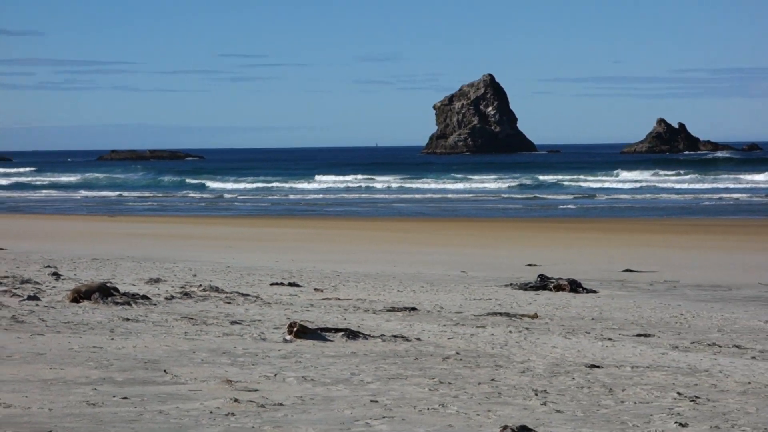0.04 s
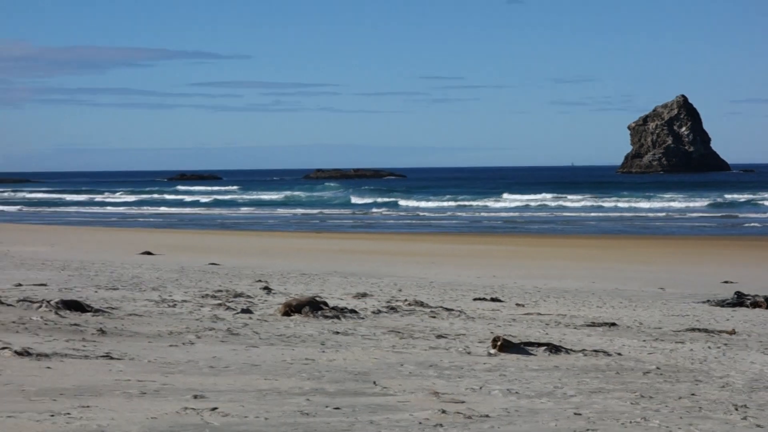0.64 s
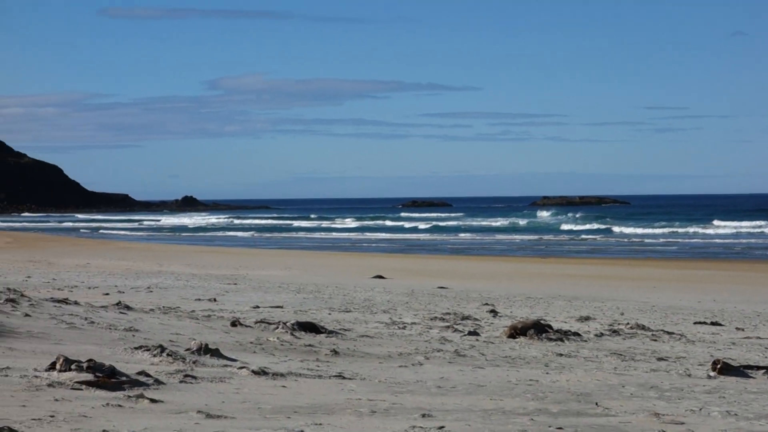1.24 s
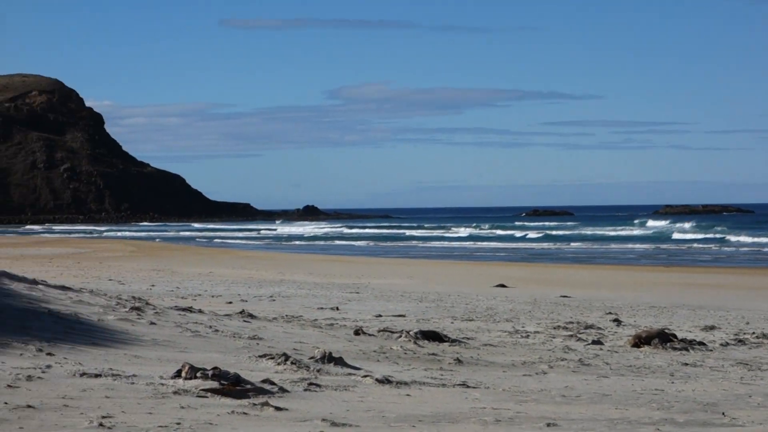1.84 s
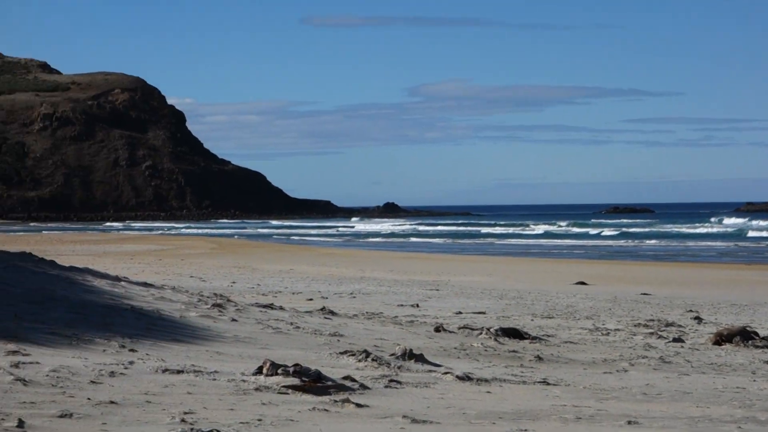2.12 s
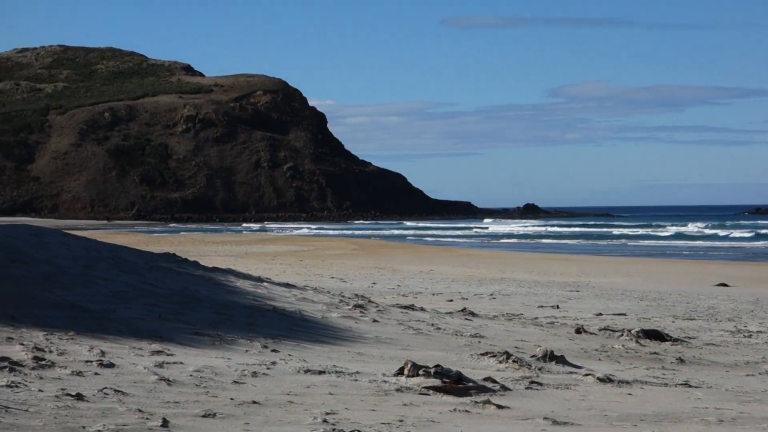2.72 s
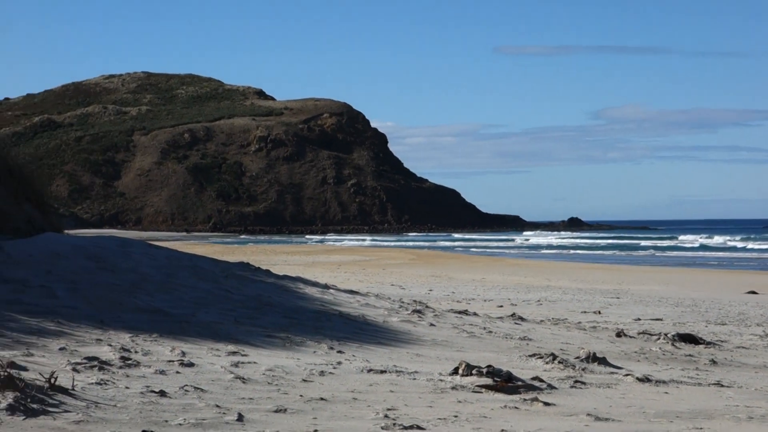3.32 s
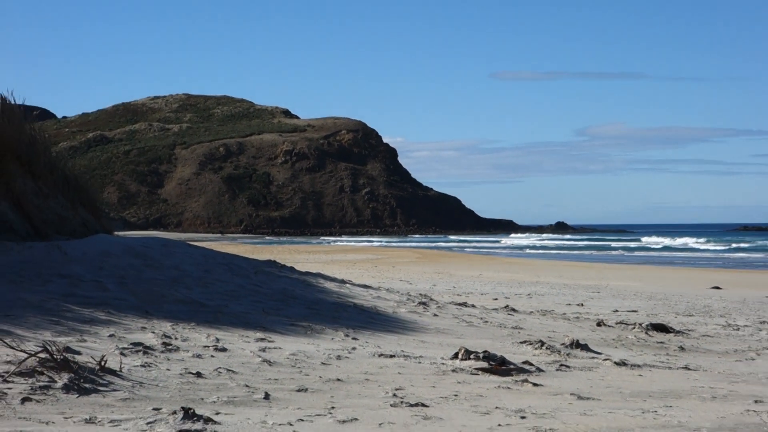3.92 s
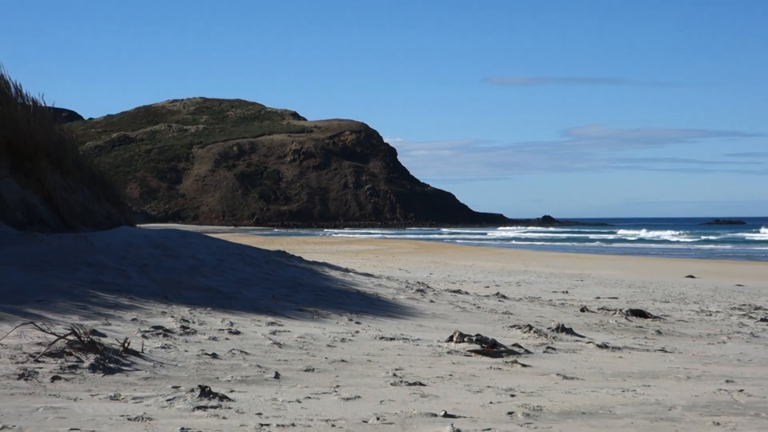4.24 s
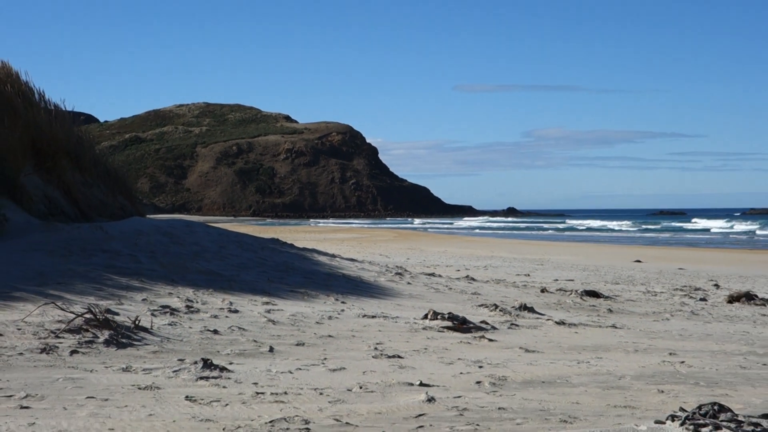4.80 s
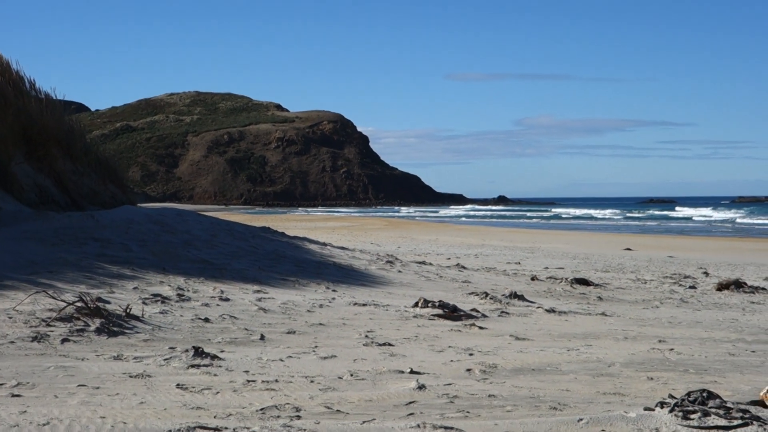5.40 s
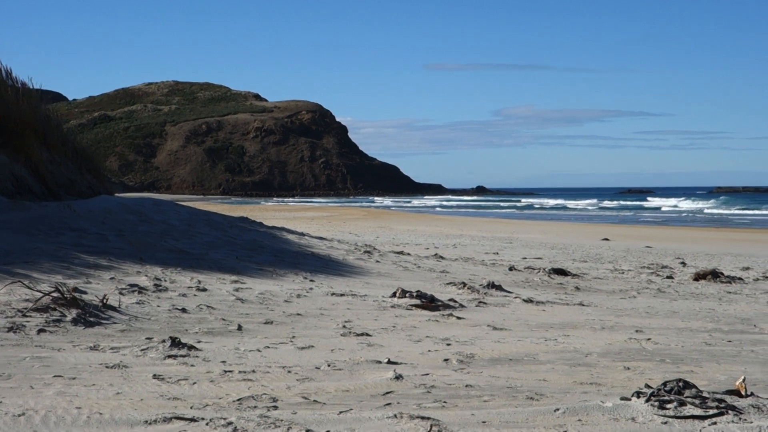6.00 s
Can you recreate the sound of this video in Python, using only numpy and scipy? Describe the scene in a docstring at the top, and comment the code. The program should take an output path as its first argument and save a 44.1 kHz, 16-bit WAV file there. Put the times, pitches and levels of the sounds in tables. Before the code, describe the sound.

On a beach, distant breakers merge into a soft, steady roar, slightly to the right. Close up, gusty wind thumps and rumbles on the camera's microphone, coming in uneven bursts with brief lulls between them. The strongest buffeting comes shortly before the middle and again near the end. Very faint finger ticks, a small zoom whirr and a light hiss sit in the background.

```python
"""Low thumps and buffeting of gusty beach wind on a hand-held camera's two microphone ports.
Each eddy crosses the ports as a short pressure pulse; gusts make the stream louder and brighter.
Distant surf washes steadily from the right. Under it lie handling ticks, a faint zoom motor
and preamp hiss."""
import sys
import numpy as np
from scipy import signal
from scipy.fft import rfft, irfft
from scipy.io import wavfile
from scipy.ndimage import uniform_filter1d

SR = 44100
rng = np.random.default_rng(int(sys.argv[2]) if len(sys.argv) > 2 else 0)


def transcribe(signal):
    """Save signal, clipped to [-1, 1], as a 16-bit WAV file at the path in sys.argv[1]."""
    frames = np.atleast_2d(signal).T
    limited = np.clip(frames, -1, 1)
    pcm = np.round(limited * 32767).astype(np.int16)
    wavfile.write(sys.argv[1], SR, pcm)


N = 267246
T = np.arange(N) / SR
HZ = np.fft.rfftfreq(N, 1 / SR)
SIDES = np.array([[.5], [-.5]])  # share of a left-minus-right difference

# hardest eddies: (time [s], body level [dB], snap level [dB], left minus right [dB])
THUMPS = [(0.008, -25, -35.5, 2), (0.084, -25, -37, 1), (0.12, -23, -47, 3), (0.226, -25.5, -44.5, -2),
          (0.728, -30, -44, -2), (0.874, -28, -53, -3), (0.925, -26, -46, -2), (1.439, -26.5, -39.5, -4),
          (1.594, -29.5, -49, -3), (1.744, -30.5, -56, 0), (1.842, -33, -58, -1), (1.989, -25.5, -52, -1),
          (2.185, -25, -31.5, 2), (2.21, -28, -38, -1), (2.255, -21, -36, -2), (2.322, -19, -41, -5),
          (2.383, -18, -21.5, -2.5), (2.402, -17.5, -29, -4), (2.411, -17, -32, -3),
          (2.426, -17, -31.5, -13), (2.47, -17.5, -43, -5), (2.502, -27, -33, 3), (2.535, -14.5, -32, 1),
          (2.597, -17.5, -43.5, 0), (3.149, -28.5, -41.5, -1), (3.51, -21, -39, 1), (3.773, -24, -41, 1.5),
          (4.626, -28.5, -43, -8), (4.884, -22.5, -41, -7), (4.925, -17.5, -29.5, -8.5),
          (5.128, -31, -49, 4), (5.279, -24, -52, -3), (5.343, -32, -40.5, -6), (5.444, -29, -33.5, -4),
          (5.502, -21.5, -43, 0), (5.577, -22, -53, 2), (5.697, -19.5, -28.5, 2), (5.808, -15.5, -41.5, 1),
          (5.853, -11.5, -35, 0.5), (5.868, -15.5, -44, 5), (5.961, -17.5, -51, -1.5),
          (5.984, -21.5, -44, 2)]


def wind_db(attack_s=0.0078, release_s=0.0074, breeze_db=-57, sway_db=3.5):
    """Wind strength per sample: each gust builds, holds and dies away over a light breeze."""
    # (start [s], length [s], level [dB], growth over the length [dB])
    gusts = [(0.086, 0.027, -33, 1), (0.184, .045, -41.5, -2), (0.265, 0.036, -48.5, 0),
             (0.415, .17, -48, 5), (0.751, 0.19, -43.5, -0.5), (0.995, 0.041, -43, -12),
             (1.131, 0.089, -40.5, -3), (1.26, 0.027, -44.5, -3), (1.402, 0.05, -38.5, -1.5),
             (1.484, 0.053, -46.5, -3), (1.56, 0.12, -46.5, -8), (1.703, .045, -43.5, -6),
             (1.835, 0.18, -51.5, -2), (2.193, 0.166, -30.5, -0.5), (2.375, 0.23, -28.5, -7),
             (2.641, 0.11, -32.5, -2.5), (2.756, .045, -38.5, 0), (3.028, 0.05, -42.5, 6),
             (3.14, .045, -45, -14), (3.421, .1, -38.5, 5), (3.55, 0.1, -52, -14),
             (3.772, 0.034, -37, -4.5), (4.615, 0.34, -38, 5.5), (4.958, 0.045, -42.5, 4),
             (5.201, 0.044, -44, 4), (5.341, 0.028, -39.5, -5), (5.417, 0.042, -41.5, 8),
             (5.505, 0.091, -32, -4.5), (5.677, 0.045, -35, -5.5), (5.801, 0.071, -33, 3.5),
             (5.897, .04, -36.5, -7), (5.981, 0.045, -32.5, -9.5)]
    power = undb(breeze_db + sway_db * walk(12)) ** 2
    for start_s, length_s, db, growth_db in gusts:
        age_s = T - start_s
        progress = np.clip(age_s / length_s, 0, 1)
        edges = np.exp(np.minimum(age_s, 0) / attack_s - np.maximum(age_s - length_s, 0) / release_s)
        power += (edges * undb(db + growth_db * (progress - .5))) ** 2
    return 10 * np.log10(power)


def eddies(when_s, db, hz, pan_db, steepness, max_lag_s):
    """Pressure bumps, each turned into a swing of one or two cycles by the microphone's bass cut."""
    phase, bearing = rng.random((len(when_s), 2)).T[:, :, None]
    rotation = np.exp(2j * np.pi * phase)
    lag_s = max_lag_s * np.cos(np.pi * bearing)  # bearing decides which port is hit first
    width_s = (steepness + .5) / (2 * np.pi * hz[:, None])
    index = (when_s * SR).astype(int)[:, None] + np.arange(-600, 600)
    inside = (index >= 0) & (index < N)
    channels = []
    for side in (.5, -.5):
        age_s = index / SR - when_s[:, None] + side * lag_s
        swing = np.real(rotation * (1 - 1j * age_s / width_s) ** -(steepness + 1))
        swing *= undb(db + side * pan_db)[:, None]
        channels.append(np.bincount(index[inside], swing[inside], N))
    return np.array(channels)


def thumps(gain_db=1.23, centre_hz=365, octaves_per_db=0.0543, snap_hz=930, snap_gain_db=1.0):
    """Hard eddies hit the ports squarely; a steeper front gives a shorter thump and more snap."""
    when_s, body_db, snap_db, pan_db = np.array(THUMPS, float).T
    body_hz = centre_hz * 2 ** (octaves_per_db * (snap_db - np.mean(snap_db)))
    front_hz = np.full(len(when_s), snap_hz)
    body = eddies(when_s, body_db + gain_db, body_hz, pan_db, steepness=5, max_lag_s=0.0005)
    front = eddies(when_s, snap_db + snap_gain_db, front_hz, pan_db, steepness=10, max_lag_s=0.0002)
    return body + front


def buffeting(gust_db, count=1500, centre_hz=262, gust_octaves=0.41, knee_db=10,
              spread_octaves=0.6, scatter_db=4.5, gain_db=0.7):
    """A stream of eddies of all sizes; faster air shortens them, so gusts are brighter up to a point."""
    when_s = (np.arange(count) + rng.random(count)) / count * T[-1]
    size, side = rng.standard_normal((count, 2)).T
    speed = 2 * rng.random(count) - 1
    force_db = np.interp(when_s, T, gust_db) - np.mean(gust_db)
    hz = centre_hz * 2 ** (gust_octaves * np.tanh(force_db / knee_db) + spread_octaves * speed)
    air = eddies(when_s, scatter_db * size, hz, pan_db=2.5 * side - 0.5,
                 steepness=4.47, max_lag_s=0.00081)
    # the gust sets the mean energy; single eddies still stand out
    energy = uniform_filter1d(np.mean(air ** 2, axis=0), size=1600)
    return air / np.sqrt(np.abs(energy) + 1e-9) * undb(gust_db + gain_db)


def lulls(depth_db=-8, lead_s=0.0085, width_s=0.004):
    """Gain of the small eddies: a brief dip just before each hard one."""
    nearness = sum(np.exp(-((T - when_s + lead_s) / width_s) ** 2) for when_s, *_ in THUMPS)
    return undb(depth_db * nearness)


def rumble(gust_db, gain_db=-13.0, follow=0.62, flutter_db=2.0, fade_db_per_s=-1.0):
    """Large slow eddies press on both ports alike, swell less and ease as the camera turns."""
    spectrum_hz_db = [(20, -35), (55, -4.5), (115, -5), (200, -0.5), (400, -19), (1500, -79)]
    air = colour(rng.standard_normal(N), spectrum_hz_db)
    swell_db = follow * gust_db + (1 - follow) * np.mean(gust_db) + flutter_db * walk(30)
    return level(air, gain_db) * undb(swell_db + fade_db_per_s * (T - np.mean(T)))


def mic_ports(air, ring_hz=330, width_hz=190, ring_share=0.26, limit=0.36):
    """The hardest pushes are rounded off; the microphone rings on for a cycle or two."""
    # response to air pressure: (frequency [Hz], gain [dB])
    response = [(40, 2), (170, 1.5), (260, 0), (400, 0.3), (550, -0.5), (750, -1), (1200, 1.5), (1800, 0.5),
                (4000, -24)]
    push = limit * np.tanh(air / limit)
    ring = signal.lfilter(*signal.iirpeak(ring_hz, ring_hz / width_hz, fs=SR), push)
    return colour((1 - ring_share) * push + ring_share * ring, response)


def surf(rms_db=-52.5, crossover_hz=2400, lag_s=.00005, flutter_db=0.84):
    """Distant breakers merge into a low roar and a hiss of foam, each swelling slowly."""
    # breaker swell, used about each column's mean: (time [s], roar [dB], foam [dB])
    swells = [(0.0, -58.5, -67), (0.85, -61.5, -71.5), (1.35, -58, -69), (2.7, -58.5, -66), (3.6, -61, -68),
              (4.8, -61.5, -72.5), (5.25, -59.5, -68.5), (6.06, -60, -69)]
    # surf at the left port, shaded by the camera body: (frequency [Hz], gain [dB])
    left_spectrum = [(30, -23), (130, -9), (400, -3), (620, -5), (1020, -10.5), (1280, -8.5), (1660, -20.5),
                     (2080, -16), (2800, -30), (3700, -24.5), (4800, -54), (12000, -45)]
    # surf at the right port: (frequency [Hz], gain [dB])
    right_spectrum = [(30, -19), (130, -7), (380, 2), (540, -2), (740, 1.5), (1020, -4), (1350, -2),
                      (1680, -10), (2080, -6.5), (2900, -15), (4000, -20), (5200, -32), (12000, -48)]
    # likeness of the two ports: (frequency [Hz], correlation [1])
    coherence = [(50, 0.47), (300, 1), (750, 0.91), (1150, 0.73), (1700, 0.8), (2100, 0.68), (3000, 0.13),
                 (6000, 1)]
    common, own = rfft(rng.standard_normal((2, N)))
    alike = over_hz(coherence)
    left = common * undb(over_hz(left_spectrum))
    right = (alike * common + np.sqrt(1 - alike ** 2) * own) * undb(over_hz(right_spectrum))
    spectra = np.array([left, right * np.exp(-2j * np.pi * HZ * lag_s)])
    roar_share = 1 / (1 + (HZ / crossover_hz) ** 4)
    when_s, roar_db, foam_db = np.transpose(swells)
    sea = 0
    for share, band_db in ((roar_share, roar_db), (1 - roar_share, foam_db)):
        swell_db = np.interp(T, when_s, band_db)
        sea += irfft(spectra * share, N) * undb(swell_db - np.mean(swell_db) + flutter_db * walk(12))
    return level(sea, rms_db)


def handling():
    """Fingers shift on the camera: soft scuffs, and firmer ticks that ring its body."""
    # (start [s], scuff [dB], ring [dB], length [s], left minus right [dB])
    touches = [(0.278, -64, -72, .012, -3), (0.529, -65, -66, 0.041, -1), (0.598, -64, -55.5, 0.0045, -4),
               (2.766, -66.5, -67, .025, -1), (2.844, -65, -69, .006, -3), (3.564, -76, -55, .005, -7),
               (4.448, -57.5, -51.5, 0.0029, -6), (4.474, -70, -80, 0.055, -3)]
    # camera body resonances: (frequency [Hz], gain [dB])
    body_spectrum = [(800, -20), (1850, -2), (2300, 7.5), (2950, -8), (3700, -3), (4600, -3.5), (5500, -18),
                     (10000, -26)]
    scuff_hz_db = [(1000, -15), (4500, -3), (8000, 0), (13000, -1), (15500, -9)]
    scuff = level(colour(rng.standard_normal((2, N)), scuff_hz_db), 0)
    ring = level(colour(rng.standard_normal((2, N)), body_spectrum), 0)
    out = np.zeros((2, N))
    for start_s, scuff_db, ring_db, length_s, pan_db in touches:
        age = np.maximum(T - start_s, 0) / length_s
        envelope = 2 * np.e * age * np.exp(-2 * age)
        out += envelope * undb(SIDES * pan_db) * (undb(scuff_db) * scuff + undb(ring_db) * ring)
    return out


def zoom_motor(rms_db=-75, ramp_s=0.028):
    """A small lens motor whirrs through a few resonances of the body."""
    # motor runs: (start [s], end [s])
    zooms = [(.6, 0.91), (2.98, 4.82)]
    # body modes: (centre [Hz], width [Hz], gain [dB], left minus right [dB])
    modes = [(3660, 660, 3.5, 8), (4570, 400, 2, -6), (8800, 2100, -9, 13), (12400, 900, -8, -5)]
    running = sum(np.clip(np.minimum(T - start_s, end_s - T) / ramp_s, 0, 1) for start_s, end_s in zooms)
    response = 0
    for centre_hz, width_hz, db, pan_db in modes:
        response += undb(db + SIDES * pan_db) / (1 + ((HZ - centre_hz) / (width_hz / 2)) ** 2)
    whirr = irfft(rfft(rng.standard_normal((2, N))) * response, N)
    return level(whirr, rms_db) * running


def preamp_hiss(left_db=-69.0, right_db=-66.5):
    """Each channel's own amplifier noise."""
    # noise shape: (frequency [Hz], gain [dB])
    spectrum = [(100, -7.5), (4000, 0), (7000, 0.5), (10000, -0.5), (12500, -1.5), (15500, -4.5)]
    return level(colour(rng.standard_normal((2, N)), spectrum), [[left_db], [right_db]])


def undb(db):
    """Decibels to gain."""
    return 10 ** (np.asarray(db) / 20)


def over_hz(points):
    """A (frequency [Hz], value) table at every FFT bin, interpolated in log frequency."""
    hz, value = np.transpose(points)
    return np.interp(np.log(HZ + 1), np.log(hz), value)


def colour(x, points):
    """Filter by a (frequency [Hz], gain [dB]) table."""
    return irfft(rfft(x) * undb(over_hz(points)), N)


def level(x, rms_db):
    """Set the rms level."""
    return x * undb(rms_db) / np.sqrt(np.mean(x ** 2))


def walk(rate_hz):
    """Random steps, smoothed twice; spread near 1."""
    hold = int(SR / rate_hz)
    steps = rng.standard_normal(1024)[np.arange(N) // hold % 1024]
    return 1.3 * uniform_filter1d(uniform_filter1d(steps, hold), hold)


def scene():
    """Wind on the ports over the sea and the camera's own small noises."""
    gust_db = wind_db()
    air = buffeting(gust_db) * lulls() + thumps() + rumble(gust_db)
    return mic_ports(air) + surf() + zoom_motor() + handling() + preamp_hiss()


def record(dry):
    """The camera cuts the top treble steeply."""
    cutoff_hz = 15720
    return signal.sosfilt(signal.ellip(12, .1, 70, cutoff_hz, fs=SR, output="sos"), dry)


dry = scene()
out = record(dry)
transcribe(out)
```